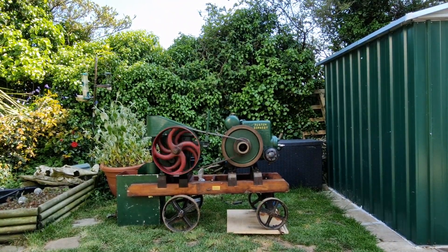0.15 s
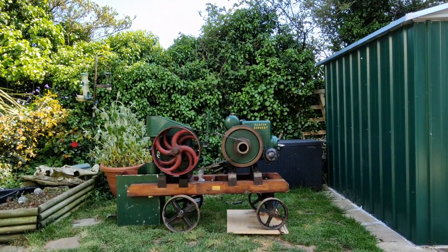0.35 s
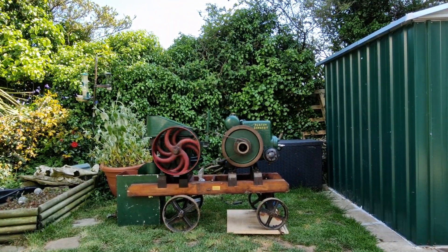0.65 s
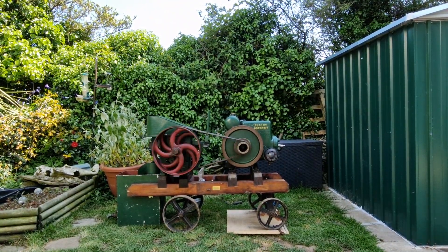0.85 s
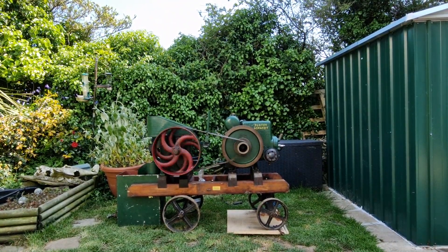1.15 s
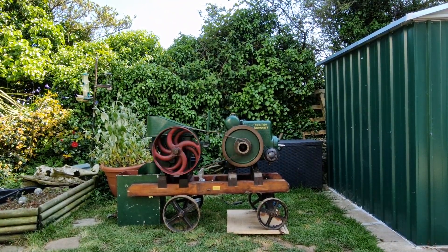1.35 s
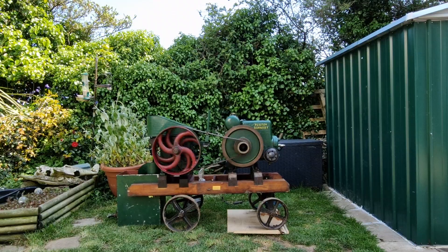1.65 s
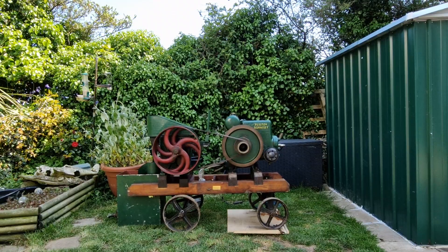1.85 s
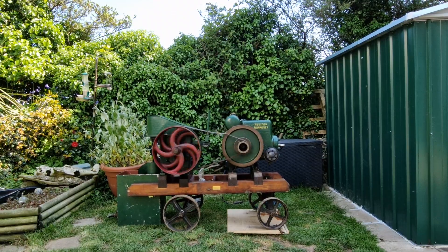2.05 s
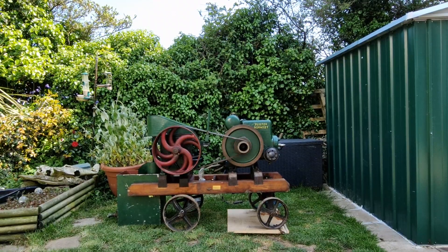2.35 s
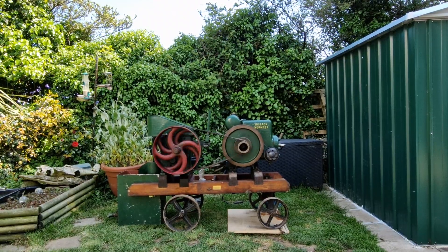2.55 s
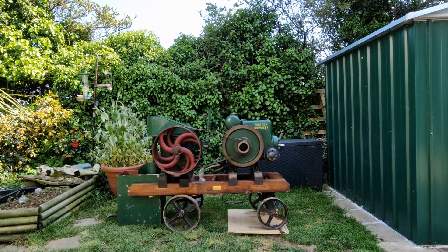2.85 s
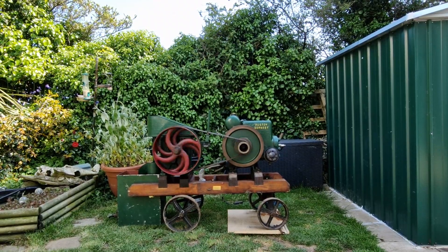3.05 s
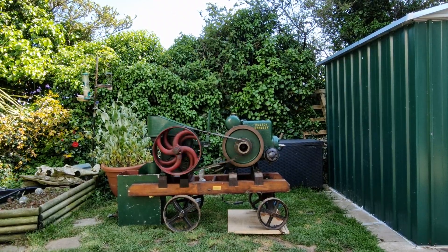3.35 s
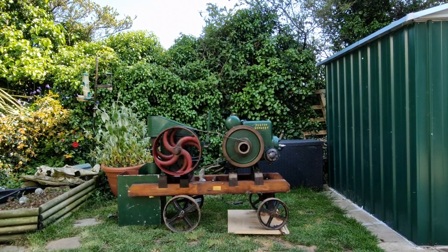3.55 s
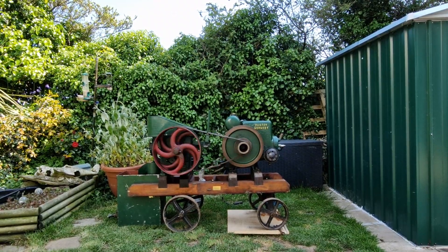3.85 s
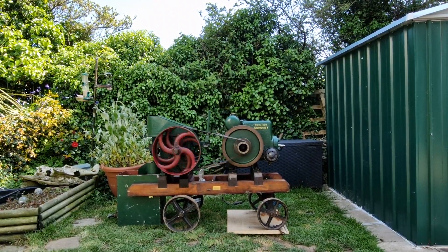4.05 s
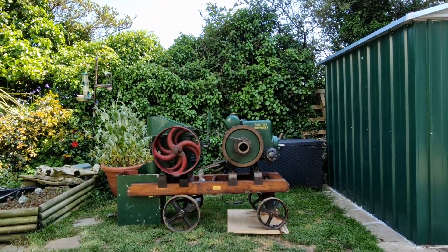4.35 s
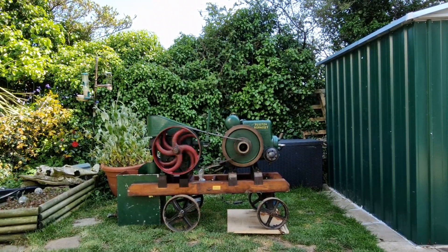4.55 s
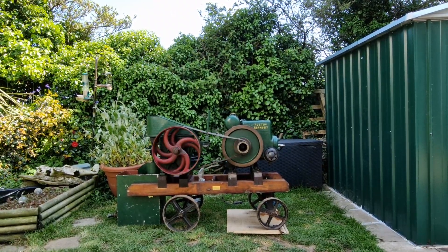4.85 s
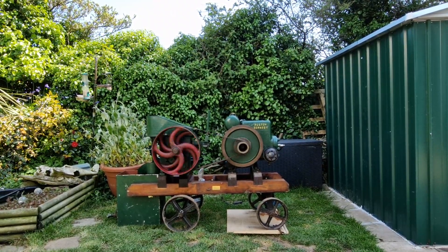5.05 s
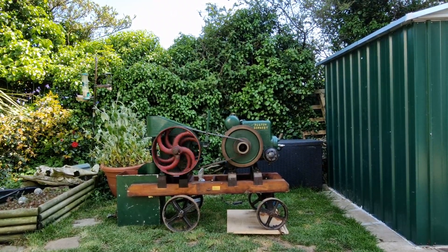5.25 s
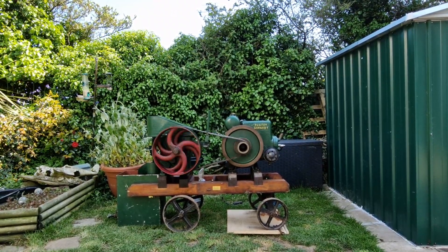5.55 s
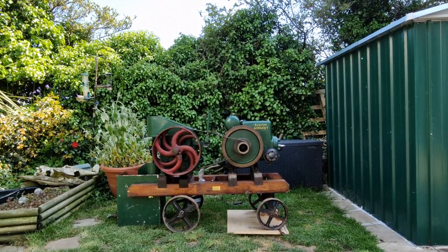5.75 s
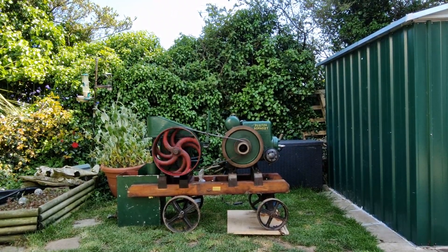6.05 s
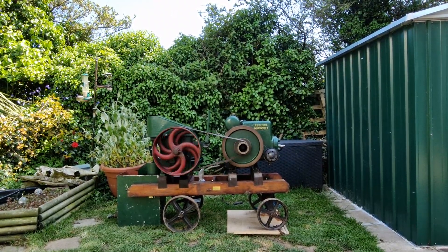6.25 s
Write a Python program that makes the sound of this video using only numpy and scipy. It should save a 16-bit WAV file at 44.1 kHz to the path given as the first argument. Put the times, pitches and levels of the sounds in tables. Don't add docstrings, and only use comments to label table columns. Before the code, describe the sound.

An old single-cylinder engine chugs steadily, about four thumping exhaust pops a second, with raspy gas puffs, clattering gears, belt squeaks and ticking joint in a garden.

```python
import sys
import numpy as np
from scipy import signal
from scipy.fft import rfft, irfft, next_fast_len
from scipy.io import wavfile
from scipy.ndimage import map_coordinates

SR = 44100
rng = np.random.default_rng(int(sys.argv[2]) if len(sys.argv) > 2 else 0)


def convert_level_to_amplitude(level_db):
    exponent = np.asarray(level_db, float) / 20
    return 10 ** exponent


def persist_wave(psi):
    counts = np.round(np.clip(psi, -1, 1) * 32767).astype(np.int16)
    wavfile.write(sys.argv[1], SR, np.atleast_2d(counts).T)


N = 282240
TIME_S = np.arange(N) / SR
CYCLE_S = 0.2335
VALVE_LEAD_S = 0.0231


def unit(x):
    return x / np.sqrt(np.mean(x ** 2) + 1e-20)


def along(points, hz):
    point_hz, value = np.transpose(points)
    return np.interp(np.log(hz + 1), np.log(point_hz + 1), value)


def wobble(rate_hz):
    knots = rng.standard_normal(int(N * rate_hz / SR) + 4)
    return map_coordinates(knots, [TIME_S * rate_hz])


def filtered(x, response):
    size = next_fast_len(N + SR // 5)
    spectrum = rfft(x, size) * response(np.fft.rfftfreq(size, 1 / SR))
    return irfft(spectrum, size)[..., :N]


def modes(rows):
    def response(f):
        total = 0
        for k, (centre_hz, width_hz, db) in enumerate(rows):
            damping = 1j * f * width_hz
            total = total + (-1) ** k * convert_level_to_amplitude(db) * damping / (centre_hz ** 2 - f * f + damping)
        return total
    return response


def resonant_noise(response):
    return unit(filtered(rng.standard_normal((2, N)), response))


def hiss(spectrum):
    return resonant_noise(lambda hz: convert_level_to_amplitude(along(spectrum, hz)))


def train(start_s, level_db, shape):
    lead, before = round(0.03 * SR), SR // 4
    places = np.round(start_s * SR).astype(int) + before
    marks = np.bincount(places, convert_level_to_amplitude(level_db), N + SR)
    t = np.arange(-lead, SR // 3) / SR
    return signal.oaconvolve(marks, shape(t))[lead + before:][:N]


def puff(width_ms):
    return lambda t: np.exp(-0.5 * (t * 1000 / width_ms) ** 2)


def burst(rise_ms, t60_s):
    return lambda t: np.where(t < 0, puff(rise_ms)(t), convert_level_to_amplitude(-60 * np.abs(t) / t60_s))


def delayed(x, delay_s):
    return np.pad(x, (round(delay_s * SR), 0))[:N]


# thump_s, thump_db, early_jet_db, late_jet_db
FIRINGS = [(0.208, -20.8, -24.5, -21), (0.4425, -11.5, -23.5, -17), (0.676, -11.5, -23.5, -17),
           (0.911, -9.5, -22, -17.5), (1.1427, -11.5, -25, -23), (1.3773, -12, -24.5, -21.5),
           (1.6117, -10.5, -23.5, -19), (1.8454, -11.5, -22.5, -16), (2.0791, -12, -23.5, -22),
           (2.3133, -10.5, -22.5, -17), (2.5474, -11, -23.5, -21), (2.7838, -10.5, -22, -17),
           (3.0191, -11.5, -23.5, -17.5), (3.2514, -11, -22.5, -19.5), (3.4853, -11.5, -23.5, -20),
           (3.7181, -11, -22, -22), (3.9489, -11.5, -23.5, -25), (4.1819, -10, -24, -19),
           (4.4143, -12, -25, -20.5), (4.6463, -10.5, -22, -19), (4.8801, -12, -21, -18),
           (5.1149, -10.5, -21.5, -19.5), (5.35, -12, -22.5, -20.5), (5.584, -11, -23, -17.5),
           (5.8167, -10.5, -22.5, -17.5), (6.0479, -11, -23, -22), (6.279, -11, -23, -19.5)]


def cycles():
    thump_s = np.transpose(FIRINGS)[0]
    return np.r_[thump_s[0] - CYCLE_S, thump_s]


# centre_hz, width_hz, level_db
PIPE_MODES = [(80, 32, -4.9), (153, 23, 4.8), (179, 65, -3.1)]
# centre_hz, width_hz, level_db
PORT_MODES = [(137, 151, -16.5), (326, 26, -4.2)]
# delay_ms, level_db
FENCES = [(33, -34), (58, -25.5), (78, -21.5), (113, -22)]


def exhaust():
    thump_s, thump_db = np.transpose(FIRINGS)[:2]
    count = len(thump_s)
    pop_db = thump_db - 9 + rng.normal(0, 1.2, count)
    pop = filtered(train(thump_s - VALVE_LEAD_S - 0.0009, pop_db + 21.5, puff(0.93)), modes(PORT_MODES))
    slug = train(thump_s - 0.0064, thump_db + 11, puff(1.96))
    dip = train(thump_s - 0.0173, thump_db + rng.normal(-3.4, 4, count), puff(0.5))
    thump = filtered(slug - dip, modes(PIPE_MODES))
    hum = filtered(train(thump_s, -48 - 2 * thump_db, puff(1)), modes([(156, 12, 0)]))
    echoes = sum(convert_level_to_amplitude(db) * delayed(thump, ms / 1000) for ms, db in FENCES)
    pop_echo = convert_level_to_amplitude(-11.5) * delayed(pop, 0.072)
    return pop + pop_echo + thump - hum + echoes


# centre_hz, width_hz, level_db, after_pop_ms, early_share (0-1)
SILENCER = [(676, 262, -8.5, 6, 0.77), (1333, 620, -6, 14.2, 0.21), (2057, 920, -9.5, 9.24, 0.1),
            (3004, 365, -3, 11.55, 0.29), (3880, 1260, -5.5, 12.1, 0.76), (5150, 1800, -2.5, 7.9, 1),
            (6180, 430, -3.5, 9.7, 1), (7340, 1470, -5, 7.3, 1), (14500, 12000, -5.5, 8.6, 1),
            (14500, 8100, -11, 23.5, 1)]
# hz, level_db_per_hz
BLOWDOWN = [(180, -7), (300, 6), (440, -3.5), (603, -0.5), (870, -14.5), (1510, -6), (1660, -12),
            (2320, -9), (2790, -32), (3240, -7.5), (3950, -8.5), (7440, -10.5), (9090, -12.5), (14500, -20),
            (16000, -17.5)]
# centre_hz, width_hz, level_db
CASTING_MODES = [(2343, 4.4, 9.5), (2830, 144, 0.5), (3290, 350, -3.5), (3690, 71, 4), (4466, 140, -1.5),
                 (4670, 106, 1.5), (5410, 50, 1.5), (6790, 320, -4.5), (7500, 65, 1.5)]


def jet():
    early_db, late_db = np.transpose(FIRINGS)[2:]
    early_db, late_db = np.r_[-27, early_db], np.r_[-27, late_db]
    pop_s = cycles() - VALVE_LEAD_S

    crackle_db = 4.1 * np.clip(wobble(900), -3, 1.6)
    gas = rng.standard_normal((2, N)) * convert_level_to_amplitude(crackle_db)
    rasp = np.zeros((2, N))
    for centre_hz, width_hz, db, after_pop_ms, early in SILENCER:
        chamber = modes([(centre_hz, width_hz, 0)])
        ring = filtered(gas, lambda f: chamber(f) ** 2)
        ring = unit(np.roll(ring, rng.integers(N), axis=1))
        level_db = db + early * early_db + (1 - early) * late_db + rng.normal(0, 1.2, len(pop_s))
        rasp += ring * train(pop_s + after_pop_ms / 1000, level_db + 0.5, burst(4.28, t60_s=0.032))

    creep = train(pop_s, early_db - 25.5, puff(8))
    leak = creep + train(pop_s + 0.014, early_db - 6, burst(6, t60_s=0.23))
    leak_hiss = leak * convert_level_to_amplitude(2 * wobble(60)) * hiss(BLOWDOWN)

    shake = train(pop_s + 0.0092, early_db - 16, burst(4.6, t60_s=0.43))
    iron = shake * convert_level_to_amplitude(2 * wobble(30)) * resonant_noise(modes(CASTING_MODES))
    return rasp + leak_hiss + iron


# knock_s, peak_db
GULPS = [(0.091, -50), (0.311, -35.5), (0.553, -46), (0.785, -41.5), (1.023, -41), (1.226, -38),
         (1.492, -42.5), (1.726, -39), (1.959, -46), (2.188, -45.5), (2.43, -41), (2.664, -48),
         (2.888, -43.5), (3.129, -47), (3.356, -37), (3.591, -49), (3.829, -58), (4.061, -48),
         (4.282, -34.5), (4.519, -47), (4.749, -35.5), (4.981, -37.5), (5.217, -47), (5.454, -34),
         (5.686, -35), (5.925, -46), (6.15, -33)]
# centre_hz, width_hz, level_db
INLET_MODES = [(151, 43, 12.5), (617, 46, 3), (1416, 284, -7), (2146, 67, -2), (3370, 320, -2)]


def inlet():
    knock_s, peak_db = np.transpose(GULPS)
    bounce = train(knock_s + 0.0121, peak_db - 6, burst(3, t60_s=0.12))
    knock = train(knock_s, peak_db, burst(0.6, t60_s=0.045)) + bounce
    tappet = modes([(650, 250, -4), (1480, 450, 0), (2800, 600, -9)])
    knock = knock * resonant_noise(lambda f: tappet(f) ** 2)

    draw = train(knock_s + 0.013, peak_db - 8.5, burst(5.6, t60_s=0.15))
    draw = draw * resonant_noise(modes(INLET_MODES))

    tap = train(knock_s + 0.002, peak_db + 26, puff(0.15))
    cover = filtered(tap, modes([(600, 14, 0), (655, 16, -1), (710, 22, -3)])) * convert_level_to_amplitude(3 * wobble(70))
    return cover + knock + draw


# after_thump_s, length_s, pitch_hz
FAINT_SLIP = [(.066, 0.029, 1783), (.113, 0.02, 1750), (.164, 0.041, 1734)]
# after_thump_s, length_s, pitch_hz
FIRM_SLIP = [(.054, .017, 1707), (.116, .032, 1760), (.167, 0.027, 1670)]
# first_db, second_db, third_db
SLIPS = [(-43, -51, -42), (-45.5, -57, -41.5), (-48, -71, -52), (-46, -50, -39), (-34, -41.5, -64),
         (-44, -44, -40.5), (-35, -52, -66), (-69, -41, -57), (-37, -66, -47), (-41.5, -37.5, -47),
         (-39, -41.5, -48), (-37, -39, -67), (-47, -64, -59), (-67, -63, -47.5), (-53, -59, -47),
         (-52, -55, -48), (-39, -44, -39.5), (-45.5, -62, -39.5), (-61, -55, -51), (-57, -47, -54),
         (-40.5, -41.5, -44.5), (-37, -44, -69), (-60, -42.5, -36.5), (-37, -41, -39.5), (-61, -42, -47),
         (-50, -48, -40.5), (-44, -52, -46), (-44, -57, -57)]


def belt():
    faint_db, firm_db = -43, -40
    level_db = np.array(SLIPS)[..., None]
    firm = np.clip((level_db - faint_db) / (firm_db - faint_db), 0, 1)
    timing = firm * FIRM_SLIP + (1 - firm) * FAINT_SLIP
    after_s, length_s, pitch_hz = np.moveaxis(timing, -1, 0)
    pitch_hz = pitch_hz * rng.normal(1, 0.01, pitch_hz.shape)
    start_s = cycles()[:, None] + after_s

    halo = modes([(1750, 260, 0)])
    rub = unit(filtered(rng.standard_normal(N), lambda f: halo(f) ** 2))
    rub = np.pad(rub, (0, SR))
    out = np.zeros(N + SR)
    columns = (start_s, level_db, length_s, pitch_hz)
    for s, db, length, hz in zip(*(column.ravel() for column in columns)):
        t = np.arange(round(1.22 * length * SR)) / SR
        here = round(s * SR)
        grip = np.minimum(t / 0.002, 1) * np.sqrt(np.abs(np.cos(np.pi / 2 * t / t[-1])))
        waver = 0.9 * np.sin(2 * np.pi * rng.uniform(30, 80) * t)
        phase = 2 * np.pi * hz * t * (1.01 - 0.35 * t) + waver
        whistle = np.sin(phase) + 0.16 * np.sin(2 * phase) + 0.14 * np.sin(3 * phase)
        slip = whistle + 0.25 * rub[here:][:len(t)]
        out[here:][:len(t)] += convert_level_to_amplitude(db + 1.5) * grip * slip
    return out[:N] * convert_level_to_amplitude(3 * wobble(120))


JOINT_DB = [-25.5, -25.5, -28.5, -25, -28.5, -25.5, -23, -28.5, -24]
# start_s, peak_db, brightest_hz
CLICKS = [
    (0.2728, -34.5, 2740),
    (0.3404, -35, 2520),
    (1.072, -36, 2130),
    (1.2425, -34, 2170),
    (1.5653, -34, 2600),
    (1.8005, -31.5, 2620),
    (2.4673, -47, 4760),
    (3.2028, -44, 5000),
    (5.979, -39, 2600),
]
# start_s, peak_db
CHIRPS = [
    (3.207, -46),
    (5.969, -46),
    (5.996, -31),
]


def joint():
    first_s, lap_s, edge_lead_s, edge_db, joint_hz = 0.121, 0.7301, 0.012, -9, 2600
    hits = list(CLICKS)
    for lap, db in enumerate(JOINT_DB):
        s = first_s + lap * lap_s
        hits += [(s, db, joint_hz), (s - edge_lead_s, db + edge_db, joint_hz)]
    ticks = [(s, db, 0.58 * hz, min(2.05 * hz, 8000)) for s, db, hz in hits]
    ticks += [(s, db, 10800, 14300) for s, db in CHIRPS]

    out = np.zeros((2, N + SR))
    t = np.arange(SR // 10) / SR
    for s, db, low_hz, high_hz in ticks:
        band = signal.butter(3, [low_hz, high_hz], "bandpass", fs=SR, output="sos")
        grains = np.repeat(rng.standard_normal(len(t) // 63 + 1), 63)[:len(t)]
        decay = convert_level_to_amplitude(-60 * t / 0.037) + 0.3 * convert_level_to_amplitude(5 * grains) * convert_level_to_amplitude(-60 * t / 0.27)
        blow = rng.standard_normal((2, len(t))) * decay
        blow[:, 0] = 3
        out[:, round(s * SR):][:, :len(t)] += convert_level_to_amplitude(db) * signal.sosfilt(band, blow)
    return out[:, :N]


# hz, level_db_per_hz
RUMBLE = [(12, -52), (20, -10), (70, 5.5), (151, -2), (200, -1.5), (325, -12.5), (420, -11), (500, -27),
          (650, -62), (1100, -120)]
# hz, level_db_per_hz
CLATTER = [(180, 10.5), (300, 8), (486, -1), (645, 5.5), (900, -2.5), (1750, -1), (2570, -9.5),
           (2880, -2.5), (5340, -12), (6000, -28), (7440, -63), (8940, -83), (10200, -23), (13500, -34),
           (16000, -47)]
# time_s, level_db
SETTLING = [(0, -5), (.4, 4), (1.7, 2), (2.7, -1.5), (4, -4), (5.2, -2), (6.4, 0.5)]


def running():
    rock_db = np.interp(TIME_S, *np.transpose(SETTLING))
    rumble = convert_level_to_amplitude(-48 + rock_db + 5.3 * wobble(35)) * hiss(RUMBLE)

    cycle_s = np.r_[cycles(), cycles()[-1] + CYCLE_S]
    crank = np.interp(TIME_S, cycle_s, np.arange(len(cycle_s)))
    swell_db = 2.5 * np.cos(2 * np.pi * (crank - 0.18))
    loose_s, loose = rng.uniform(size=(2, 260)) * [[N / SR], [1]]
    rattles = train(loose_s, 12 * loose - 9, burst(0.4, t60_s=0.03))
    uneven = convert_level_to_amplitude(1.5 * wobble(40)) + rattles
    clatter_db = -48 + 0.033 * rock_db + swell_db + 0.92 * wobble(3.32)
    return rumble + convert_level_to_amplitude(clatter_db) * uneven * hiss(CLATTER)


# hz, t60_s
GARDEN = [(100, 0.36), (1000, 0.42), (8000, 0.13)]


def garden(x):
    hz, t, z = signal.stft(rng.standard_normal((2, SR // 2)), SR, nperseg=256)
    fall = convert_level_to_amplitude(-60 * t / along(GARDEN, hz)[:, None])
    tail = signal.istft(z * fall, SR, nperseg=256)[1]
    tail = tail / np.linalg.norm(tail[0])
    return signal.fftconvolve(np.pad(x, (400, 0))[None], tail, axes=1)[:, :N]


# start_s, level_db
BUFFETS = [
    (0.332, -33),
    (0.392, -25),
    (1.032, -25),
    (1.24, -27),
    (1.288, -37),
    (1.72, -25.5),
    (1.949, -47),
    (2.368, -20),
    (2.628, -26),
]


def wind():
    start_s, level_db = np.transpose(BUFFETS)
    push = filtered(train(start_s, level_db + 11.5, puff(0.65)), modes([(68.5, 35, 0)]))
    return -push * convert_level_to_amplitude([[2], [-2]])


# hz, level_db
LEFT_DB = [(60, 3.5), (200, -0.5), (380, 2), (700, -1), (1290, 2), (2380, 0), (3400, 8.5), (4400, 14),
           (8120, 23.5), (13000, 18), (15500, 32)]
# hz, share (0-1)
ALIKE = [(60, .97), (250, .85), (800, .82), (1400, .62), (3000, .68), (6000, .6), (12000, .66)]
# hz, lead_rad
LEAD = [(60, 0), (860, .15), (1400, .5), (2500, 1.2), (4050, 2.4), (5680, 7.4), (8100, 20.6), (11500, 30),
        (16000, 44)]


def ports(pair, shadow):
    def to_right(hz):
        alike = np.clip(along(ALIKE, hz), 0, 1)
        path = np.exp(-1j * along(LEAD, hz)) * convert_level_to_amplitude(-shadow * along(LEFT_DB, hz))
        return path * [alike, np.sqrt(1 - alike ** 2)]
    return np.array([pair[0], filtered(pair, to_right).sum(0)])


def bass_ports(low):
    lag_rad = 0.15
    return filtered(low, lambda hz: np.exp(np.outer([-0.5j, 0.5j], lag_rad * (hz > 0))))


def belt_ports(squeak):
    shadow_hz = 2600
    return filtered(squeak, lambda hz: [convert_level_to_amplitude(-7) + 0 * hz, 1 / (1 + (hz / shadow_hz) ** 6)])


def scene():
    low, squeak, knock = exhaust(), belt(), inlet()
    near = ports(jet() + joint(), shadow=0.83) + ports(knock + running(), shadow=0.78)
    far = ports(convert_level_to_amplitude(-17) * garden(squeak + knock[0]), shadow=0.5) + convert_level_to_amplitude(-46) * garden(low)
    return near + far + bass_ports(low) + belt_ports(squeak) + wind()


# hz, gain_db
MICROPHONE = [(20, 0.5), (7700, -1.5), (8200, -6.5), (8800, -10.5), (9700, -11.5), (11300, -4.5),
              (13200, 3), (14400, 2.5), (15650, -7.5), (15950, -45)]


def microphone(x):
    return filtered(x, lambda hz: convert_level_to_amplitude(along(MICROPHONE, hz)))


# hz, limit_db
GATE = [(7700, -140), (8200, -88), (9500, -89), (10000, -100), (11500, -107), (14800, -104), (15600, -94)]


def gate(x):
    hz, _, z = signal.stft(x, SR, nperseg=2048)
    bands = (np.abs(z[:, :1024]) ** 2).reshape(2, 64, 16, -1).mean(axis=2)
    limit_db = along(GATE, hz[8:1024:16])[:, None] - 3 + rng.normal(0, 3, bands.shape)
    z[:, :1024] *= np.repeat(bands > convert_level_to_amplitude(2 * limit_db), 16, axis=1)
    return signal.istft(z, SR, nperseg=2048)[1][:, :N]


def low_pass(x):
    return signal.sosfilt(signal.butter(12, 16320, fs=SR, output="sos"), x)


def record(dry):
    mix = gate(microphone(dry))
    return low_pass(mix)


dry = scene()
out = record(dry)
persist_wave(out)
```